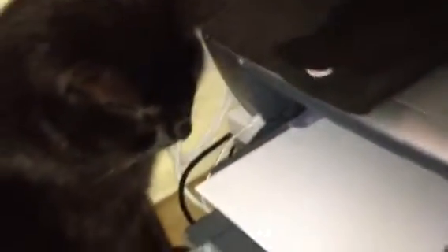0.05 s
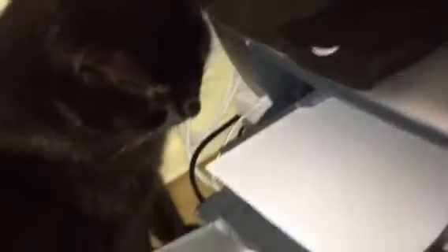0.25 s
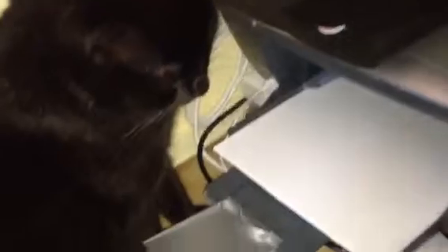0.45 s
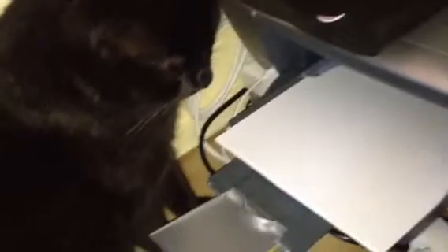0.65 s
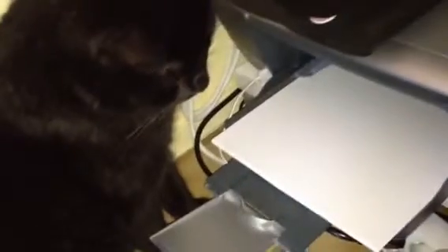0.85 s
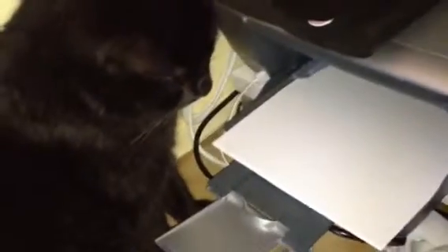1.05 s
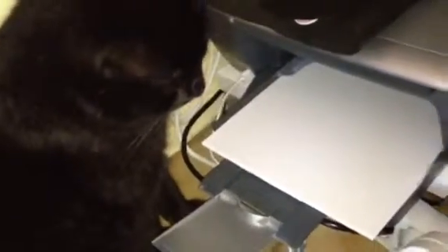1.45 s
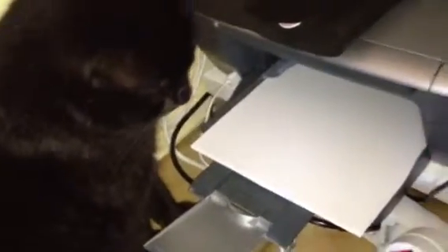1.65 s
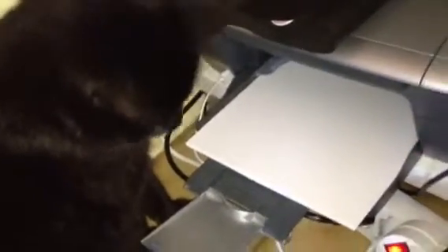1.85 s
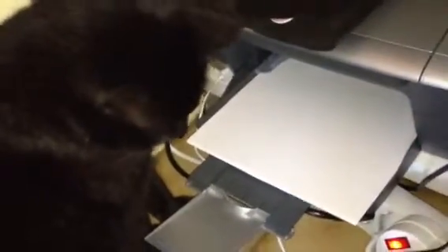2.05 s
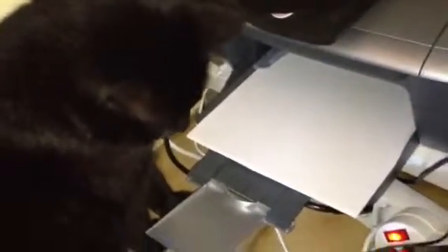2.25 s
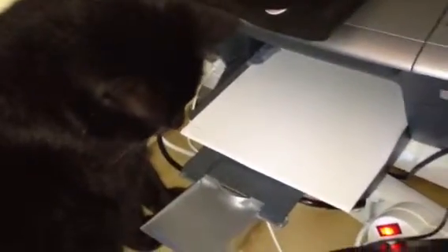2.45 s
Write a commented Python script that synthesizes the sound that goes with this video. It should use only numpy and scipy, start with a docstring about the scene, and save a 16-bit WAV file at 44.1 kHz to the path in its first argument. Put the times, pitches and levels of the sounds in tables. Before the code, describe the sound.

Irregular clacks and a motor whir from a desk printer pulling paper through.

```python
"""A small quiet room, the microphone close to a desk printer as it draws in a sheet of paper.
Cams and latches clack at uneven intervals; some blows leave springs and levers ringing.
Gears rumble and hum in the plastic case, the feed motor whines, and a panel booms as the load shifts.
The sheet hisses along the rollers with a few tiny squeaks, then the drive runs down."""
import sys
import numpy as np
from scipy import signal
from scipy.io import wavfile
from scipy.ndimage import uniform_filter1d

SR = 44100
rng = np.random.default_rng(int(sys.argv[2]) if len(sys.argv) > 2 else 0)


def store_wav(level_fs):
    """Save 16-bit WAV to argv[1]."""
    pcm = np.round(np.clip(np.atleast_2d(level_fs), -1, 1) * 32767)
    wavfile.write(sys.argv[1], SR, pcm.T.astype(np.int16))


N = 114660
TIME = np.arange(N) / SR
BAND_EDGES_HZ = np.geomspace(28, 17000, 26)
BAND_CENTRES_HZ = np.sqrt(BAND_EDGES_HZ[1:] * BAND_EDGES_HZ[:-1])

# blows of cams and latches, levels before their trims:
# (time [s], chatter length [s], thud [dB], knock [dB], knock pitch [Hz], snap [dB])
BLOWS = [(0.013, 0.0038, -58, -50.5, 835, -66.5), (0.223, 0.011, -63, -35.5, 2050, -47),
         (0.241, 0.013, -56, -49, 1400, -48.5), (0.275, 0.0065, -46, -51.5, 900, -75),
         (0.392, 0.014, -67, -51, 950, -77), (0.45, 0.019, -51.5, -53, 1910, -70),
         (0.524, 0.0031, -62, -67, 2400, -44), (0.585, 0.005, -57, -54.5, 2390, -59),
         (0.781, 0.01, -57, -66, 902.5, -53.5), (.820, 0.012, -65, -47.5, 1210, -55),
         (0.837, 0.0064, -46, -49, 900, -56.5), (0.901, 0.0035, -44, -49, 1700, -49),
         (0.9101, 0.0021, -58, -39, 2460, -43.5), (1.016, 0.0072, -43.5, -44, 1320, -50),
         (1.054, .005, -53, -53, 1600, -58), (1.069, 0.011, -45.5, -46, 1730, -51),
         (1.083, 0.037, -55, -46.5, 845, -68), (1.1243, 0.012, -45.5, -38, 1740, -40.5),
         (1.1793, 0.0026, -47, -35, 1430, -46), (1.3116, 0.013, -49, -39, 2070, -50),
         (1.344, 0.0075, -50.5, -45, 1000, -42), (1.4954, 0.0043, -67, -42.5, 2400, -48.5),
         (1.5203, 0.0051, -41, -40, 1600, -54), (1.5537, 0.0022, -44, -35.5, 2180, -50),
         (1.629, 0.012, -47, -43, 1650, -53), (1.681, 0.0044, -53, -40, 1850, -50.5),
         (1.691, 0.0056, -42.5, -37, 910, -46.5), (1.701, 0.0064, -43, -42, 1200, -50),
         (1.715, 0.015, -61, -44, 1250, -49.5), (1.731, 0.0073, -42, -40.5, 2300, -39.5),
         (1.842, 0.003, -50, -43.5, 2510, -66), (1.862, 0.016, -55, -45.5, 891, -58.5),
         (1.883, 0.0025, -61, -56, 900, -55.5), (2.065, 0.0049, -66, -58, 1970, -61),
         (2.107, 0.0055, -48.5, -50, 899, -58), (2.145, .003, -74, -53.5, 2020, -54),
         (2.165, 0.0068, -50, -49, 1490, -79), (2.181, 0.014, -47, -49, 1098, -58.5),
         (2.207, 0.0096, -41, -45.5, 1740, -57.5), (2.228, 0.014, -56, -43.5, 1200, -62),
         (2.248, 0.0047, -41.5, -49.5, 1410, -61), (2.271, 0.0032, -57, -51, 1110, -65),
         (2.318, 0.012, -47, -60, 900, -61.5)]
THUD_TRIM_DB, KNOCK_TRIM_DB, SNAP_TRIM_DB = -6, -2, -2
ATTACK_SHARE, CHATTER_GRAIN_DB, CHATTER_SAG_DB_PER_S = 0.34, 2, 150
KNOCK_TOP_HZ = 4940  # the knocks fall off steeply above this frequency
# ring-out of a blow: (frequency [Hz], time to fall 60 dB [s])
BLOW_T60 = [(200, 0.13), (1000, 0.075), (4000, 0.057), (12000, 0.044)]
# spectrum of a knock: (frequency [multiple of its pitch], relative density [dB])
KNOCK_SPECTRUM = [(.12, -10.5), (.4, -0.5), (.8, 1.5), (1.2, -2), (2.2, -10.5), (4.5, -24), (12, -66)]
# spectra of the other noises: (frequency [Hz], relative density [dB])
ROOM_TONE_SPECTRUM = [(30, -30), (65, -23), (100, 5.5), (140, -15), (300, 4.5), (600, -3.5), (900, -4.5),
                      (1500, -7), (3900, -11), (5000, -11.5), (7500, -9), (9000, -14.5), (12000, -13.5),
                      (15000, -10)]
THUD_SPECTRUM = [(60, -32), (140, -4), (260, -1.5), (430, 0.5), (900, -21), (3000, -63)]
SNAP_SPECTRUM = [(500, -46), (2000, 3), (3300, -7.5), (4700, 0.5), (5500, -8.5), (7500, -3), (10000, -15),
                 (15000, -17)]
GEAR_SPECTRUM = [(90, 10), (140, 0.5), (250, 0), (450, 2.5), (800, -3.5), (1100, -15), (2000, -8.5),
                 (3000, -28), (6000, -31), (14000, -51)]
PAPER_SPECTRUM = [(900, 13.5), (2000, 4), (4500, 3), (5400, 1), (7300, 2.5), (9500, -6.5), (13000, 0.5),
                  (15000, -50)]
# resonances of the plastic case: (frequency [Hz], width [Hz], level re the direct sound [dB])
CASE_MODES = [(138.7, 6.9, -3), (181, 8.7, -3), (240, 18.6, 1.5), (278, 20, 3.5), (454, 11, -20),
              (773, 30.6, 3), (4480, 260, -5.5)]
# decay of the room: (frequency [Hz], time to fall 60 dB [s])
REVERB_T60 = [(150, 0.34), (1000, 0.57), (4000, 0.37), (12000, 0.045)]
# room tail at the microphone: (frequency [Hz], level re the direct sound [dB])
REVERB_LEVEL = [(150, -6.5), (1000, -9), (4000, -10.5), (12000, -14)]
# loudness curve of the drive, shared by gears and hum: (time [s], level [dB])
DRIVE_LEVEL = [(.22, -76), (.245, -47.5), (.35, -57.5), (.5, -53.5), (.6, -55.5), (.74, -57), (.84, -49),
               (.98, -55), (1.1, -53), (1.21, -60), (1.3, -59.5), (1.36, -52.5), (1.47, -53), (1.6, -49),
               (1.8, -51.5), (2.0, -53), (2.16, -51.5), (2.26, -46.5), (2.35, -52), (2.41, -67.5),
               (2.6, -73.5)]
# low tones of the case while the gears turn: (frequency [Hz], level re the drive curve [dB])
HUM_TONES = [(145, -10.5), (227, -7)]
# the sheet sliding: (time [s], level [dB])
PAPER_LEVEL = [(.22, -90), (.26, -58.5), (1.15, -59), (1.29, -68.5), (1.37, -58), (1.47, -61), (1.75, -60),
               (1.95, -61), (2.25, -61), (2.39, -81.5)]
# struck springs, levers and plates: (time [s], frequency [Hz], level [dB], time to fall 60 dB [s])
RINGING_PARTS = [(.226, 760, -41.5, 0.15), (.826, 774, -44, 0.13), (.910, 1553, -39.5, 0.038),
                 (.910, 2038, -41, 0.075), (.910, 2230, -38.5, 0.042), (1.130, 791, -46, 0.18),
                 (1.181, 647, -37.5, 0.061), (1.181, 1256, -50, 0.35), (1.316, 1610, -52, .09),
                 (1.733, 4780, -38, 0.03), (2.236, 2008, -41, 0.05)]
# whine of the feed motor: (time [s], pitch [Hz], level [dB])
MOTOR_CURVE = [(.29, 505, -69), (.32, 530, -52), (.345, 586, -58.5), (.44, 574.8, -55), (.5, 589.3, -54.5),
               (.6, 590, -59.5), (.7, 591, -53), (.89, 595.3, -55), (1.0, 580, -55), (1.1, 606, -59),
               (1.28, 588, -64), (1.4, 585, -64.5), (1.56, 583, -60), (1.63, 580.3, -49),
               (1.68, 590.6, -63), (1.95, 580, -66), (2.05, 584, -60.5), (2.14, 556.5, -58.5),
               (2.3, 531, -95)]
# squeaks of the rollers: (time [s], length [s], pitch [Hz], peak level [dB])
ROLLER_SQUEAKS = [(0.358, 0.031, 11700, -54), (0.685, .012, 14170, -53.5), (0.737, 0.042, 12700, -55.5),
                  (0.797, 0.021, 11500, -54.5), (0.959, 0.033, 12100, -50.5)]
# booms of a large panel: (time [s], pitch [Hz], peak level [dB], swell time [s])
PANEL_BOOMS = [(.615, 146, -55.5, 0.041), (0.786, 233, -44.5, 0.011), (1.126, 346, -44, 0.013),
               (1.526, 265.4, -33, 0.0081), (1.553, 242, -38.5, 0.0084), (1.696, 274, -31, 0.0067),
               (1.908, 224.8, -44, 0.014), (2.183, 228.5, -41.5, .025), (2.245, 437, -47, 0.0078)]


def from_db(db):
    """Decibels to gain."""
    return 10 ** (np.asarray(db) / 20)


def unit_rms(x):
    """Scale to unit rms."""
    return x / np.sqrt(np.mean(x ** 2) + 1e-20)


def in_time(rows):
    """Each column of a curve at every sample."""
    times, *columns = np.transpose(rows)
    return [np.interp(TIME, times, column) for column in columns]


def at_hz(points, hz):
    """Read a table on a log-frequency axis."""
    freqs, values = np.transpose(points)
    return np.interp(np.log(hz), np.log(freqs), values)


def decay(age, t60):
    """A fall of 60 dB every t60 seconds."""
    return np.exp(-np.log(1000) * age / t60)


def phase_of(hz):
    """Running phase of a changing pitch."""
    return 2 * np.pi * np.cumsum(hz) / SR


def drift(hz):
    """Random wander at unit rms, mostly slower than hz."""
    r = np.exp(-2 * np.pi * hz / SR)
    return unit_rms(signal.lfilter([1], [1, -2 * r, r * r], rng.standard_normal(N + SR))[SR:])


def band(x, k):
    """Band k of the filter bank, at unit rms."""
    bandpass = signal.butter(2, BAND_EDGES_HZ[k:k + 2], "band", fs=SR, output="sos")
    return unit_rms(signal.sosfilt(bandpass, x + 1e-18))


def band_gains(spectrum):
    """Gains that give a spectrum at unit total power."""
    gains = from_db(at_hz(spectrum, BAND_CENTRES_HZ)) * np.sqrt(np.diff(BAND_EDGES_HZ))
    return gains / np.linalg.norm(gains)


def coloured_noise(spectrum, force=1):
    """Noise driven by a force and shaped by a spectrum."""
    return sum(g * band(force * rng.standard_normal(N), k) for k, g in enumerate(band_gains(spectrum)))


def room_tone(level_db=-68):
    """The faint steady noise of the room."""
    return from_db(level_db) * coloured_noise(ROOM_TONE_SPECTRUM)


def clacks():
    """Cams and latches chatter and ring out: a thud of the case, a knock of the part, a bright snap."""
    out, age = np.zeros(N), TIME[:SR // 5]
    grain = unit_rms(from_db(CHATTER_GRAIN_DB * drift(350)))
    thud = from_db(THUD_TRIM_DB) * band_gains(THUD_SPECTRUM)
    snap = from_db(SNAP_TRIM_DB) * band_gains(SNAP_SPECTRUM)
    rolloff = 1 / np.hypot(1, (BAND_CENTRES_HZ / KNOCK_TOP_HZ) ** 10)
    knock_spectra = [[(pitch * ratio, db) for ratio, db in KNOCK_SPECTRUM] for *_, pitch, _ in BLOWS]
    knocks = [from_db(KNOCK_TRIM_DB) * rolloff * band_gains(spectrum) for spectrum in knock_spectra]
    for k, hz in enumerate(BAND_CENTRES_HZ):
        # even out the noise so that the blows set its envelope
        noise = signal.hilbert(band(rng.standard_normal(N), k))
        ringing = noise.real / np.sqrt(uniform_filter1d(abs(noise) ** 2, size=200) / 2 + 1e-12)
        power = np.zeros(N + SR)
        for (onset, length, thud_db, knock_db, _, snap_db), knock in zip(BLOWS, knocks):
            parts = from_db([thud_db, knock_db, snap_db]) * [thud[k], knock[k], snap[k]]
            attack = np.minimum(age / (ATTACK_SHARE * length), 1)
            sag = from_db(CHATTER_SAG_DB_PER_S * (length / 2 - np.minimum(age, length)))
            ring_out = decay(np.maximum(age - length, 0), at_hz(BLOW_T60, hz))
            start = int(onset * SR)
            power[start:start + len(age)] += (np.linalg.norm(parts) * attack * sag * ring_out) ** 2
        out += ringing * np.sqrt(power[:N]) * (grain if hz > 800 else 1)
    return out


def plastic_case(x):
    """The panels of the case add their resonances."""
    out = x.copy()
    for hz, width_hz, db in CASE_MODES:
        r = np.exp(-np.pi * width_hz / SR)
        feedforward = (1 - r * r) / 2 * np.array([1, 0, -1])
        feedback = [1, -2 * r * np.cos(2 * np.pi * hz / SR), r * r]
        out += from_db(db) * signal.lfilter(feedforward, feedback, x)
    return out


def room_reverb(x, delay_s=0.004):
    """The walls send a short diffuse tail back to the microphone; its treble dies first."""
    age, response = TIME[:SR // 2], 0
    for k, hz in enumerate(BAND_CENTRES_HZ):
        noise = band(rng.standard_normal(len(age)), k)
        tail = noise * decay(age, at_hz(REVERB_T60, hz)) * (age > delay_s)
        gain = from_db(at_hz(REVERB_LEVEL, hz)) * np.sqrt(2 * np.diff(BAND_EDGES_HZ)[k] / SR)
        response += gain * tail / np.linalg.norm(tail)
    return signal.fftconvolve(x, response)[:N]


def gears(teeth_per_s=1000, spread_db=6.5, trim_db=-4.5):
    """Teeth tick unevenly as the wheels turn, blurring into a rumble."""
    drive_db, = in_time(DRIVE_LEVEL)
    contacts = rng.random(N) < teeth_per_s / SR
    ticks = contacts * from_db(spread_db * rng.uniform(-1.2, 1, N))
    force = uniform_filter1d(ticks, size=40)
    return from_db(drive_db + trim_db) * coloured_noise(GEAR_SPECTRUM, force)


def case_hum(waver_db=0.5, pitch_wander=0.02):
    """The running drive keeps the case humming, never quite steadily."""
    drive_db, = in_time(DRIVE_LEVEL)
    out = np.zeros(N)
    for hz, db in HUM_TONES:
        gain = from_db(drive_db + db + waver_db * drift(14))
        out += gain * np.sin(phase_of(hz * (1 + pitch_wander * drift(11.6))))
    return out


def paper_hiss(flicker_db=0.58):
    """The sheet hisses as it slides over the rollers."""
    db, = in_time(PAPER_LEVEL)
    return from_db(db + flicker_db * drift(47)) * coloured_noise(PAPER_SPECTRUM)


def ringing_parts():
    """Small struck parts ring on as dying sines."""
    out = np.zeros(N)
    for onset, hz, db, t60 in RINGING_PARTS:
        age = np.maximum(TIME - onset, 0)
        out += from_db(db) * decay(age, t60) * np.sin(2 * np.pi * hz * age)
    return out


def feed_motor(pitch_flutter=0.0069, roughness_db=3, octave_db=-19.5):
    """The motor whines with a slight flutter and a weak octave."""
    hz, db = in_time(MOTOR_CURVE)
    phase = phase_of(hz * (1 + pitch_flutter * drift(23.6)))
    whine = np.sqrt(2) * (np.sin(phase) + from_db(octave_db) * np.sin(2 * phase))
    running = (TIME > MOTOR_CURVE[0][0]) & (TIME < MOTOR_CURVE[-1][0])
    return running * from_db(db + roughness_db * drift(44)) * whine


def roller_squeaks(jitter_hz=350):
    """The rollers squeak in brief, very high, unsteady tones."""
    out = np.zeros(N)
    for onset, length, hz, db in ROLLER_SQUEAKS:
        swell = np.sin(np.pi * np.clip((TIME - onset) / length, 0, 1))
        out += from_db(db) * swell * np.sin(phase_of(hz + jitter_hz * drift(450)))
    return out


def panel_booms():
    """The drive takes up or drops its load: a panel swells into one low note and is soon damped."""
    out = np.zeros(N)
    for onset, hz, db, swell_s in PANEL_BOOMS:
        age = np.maximum(TIME - onset, 0)
        swell = (age / swell_s * np.exp(1 - age / swell_s)) ** 2
        out += from_db(db) * swell * np.sin(2 * np.pi * hz * age)
    return out


def scene(low_cut_hz=132.7, bass_leak_db=-38.5):
    """The printer close up in mono, over room tone; its small panels radiate almost no deep bass."""
    mechanism = plastic_case(clacks() + gears())
    printer = mechanism + room_reverb(mechanism) + ringing_parts() + panel_booms()
    printer += feed_motor() + case_hum() + paper_hiss() + roller_squeaks()
    low_cut = signal.butter(10, low_cut_hz, "high", fs=SR, output="sos")
    radiated = signal.sosfilt(low_cut, printer) + from_db(bass_leak_db) * printer
    return (radiated + room_tone())[None]


def record(dry, cutoff_hz=15300):
    """A steep low-pass takes the very top off the microphone signal."""
    return signal.sosfilt(signal.ellip(10, .2, 70, cutoff_hz, fs=SR, output="sos"), dry)


dry = scene()
out = record(dry)
store_wav(out)
```